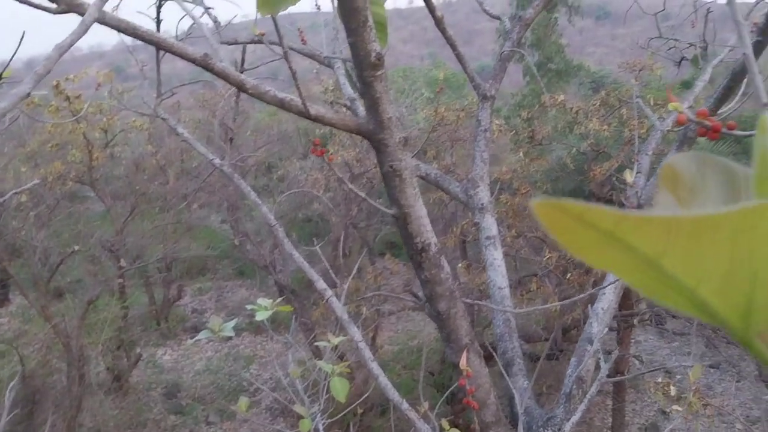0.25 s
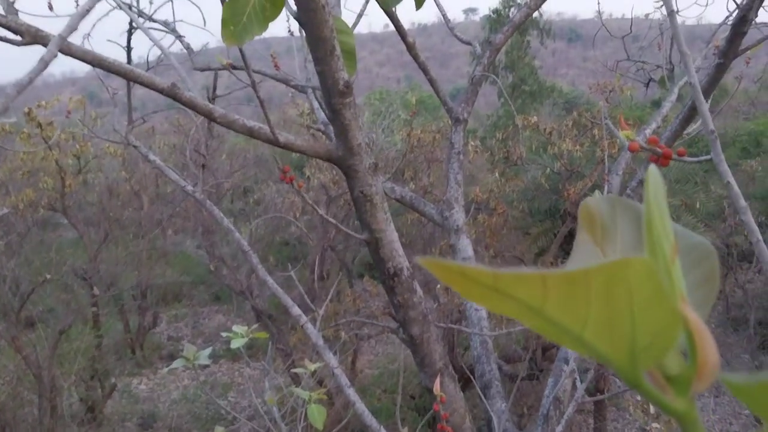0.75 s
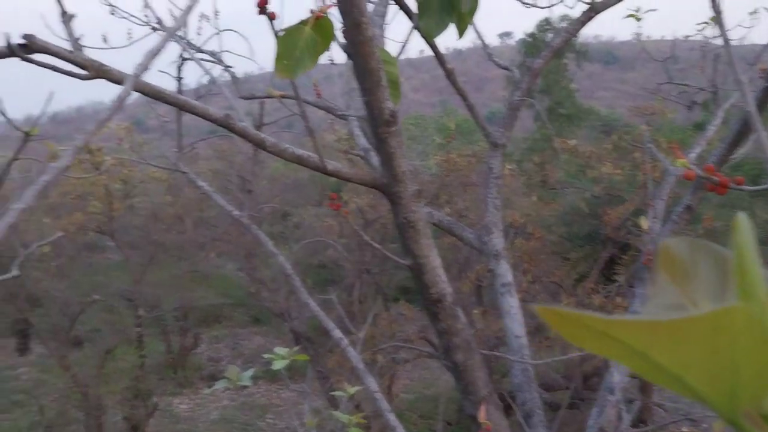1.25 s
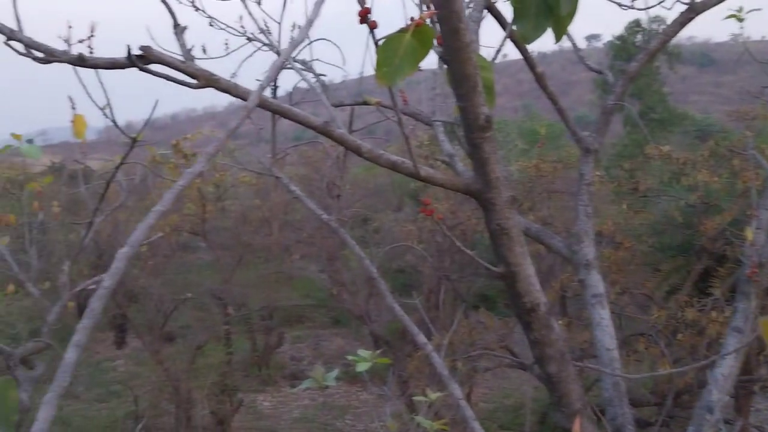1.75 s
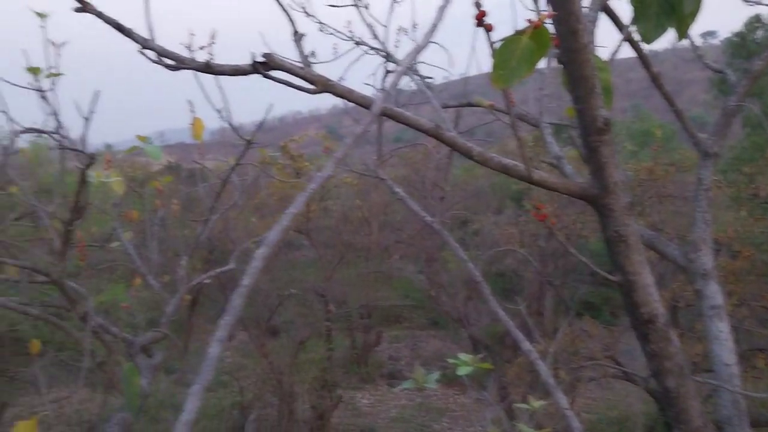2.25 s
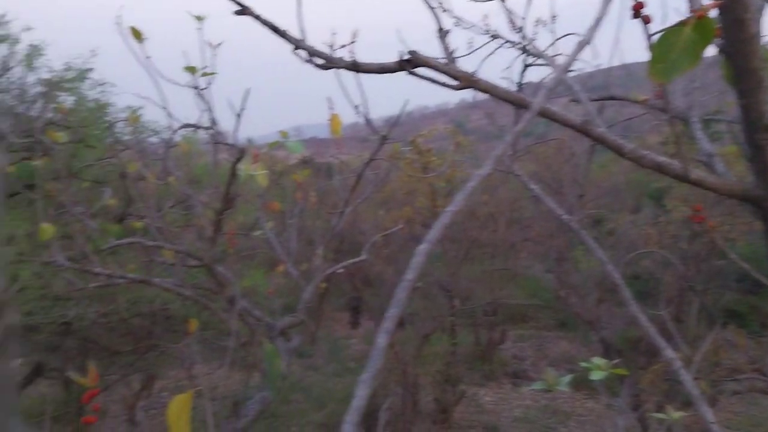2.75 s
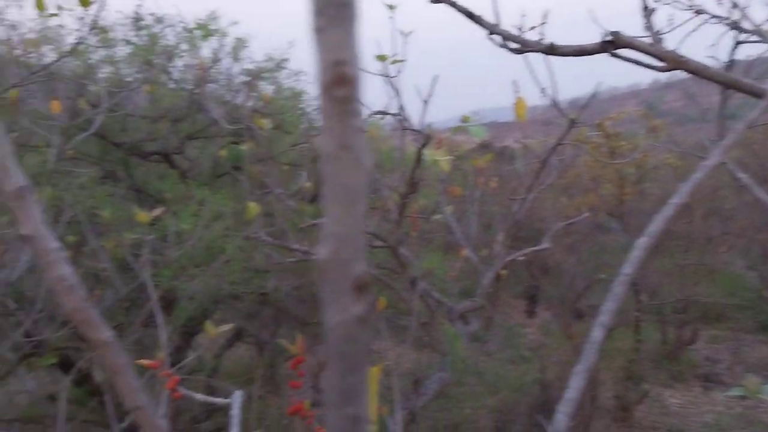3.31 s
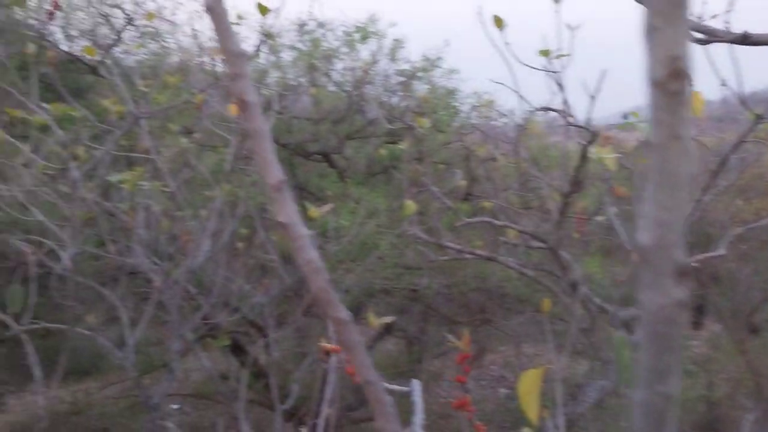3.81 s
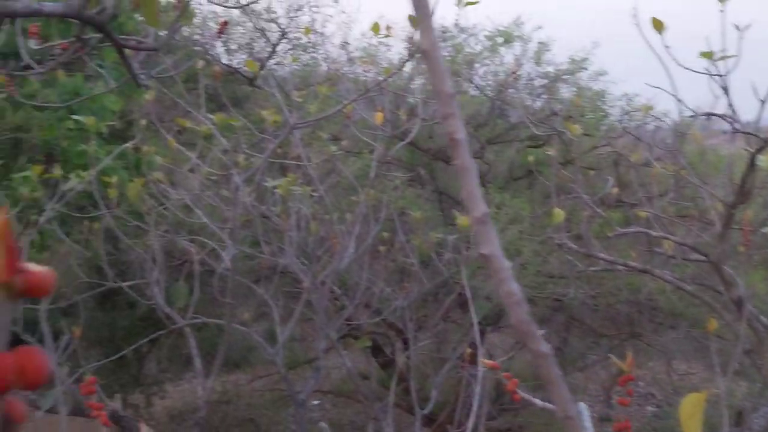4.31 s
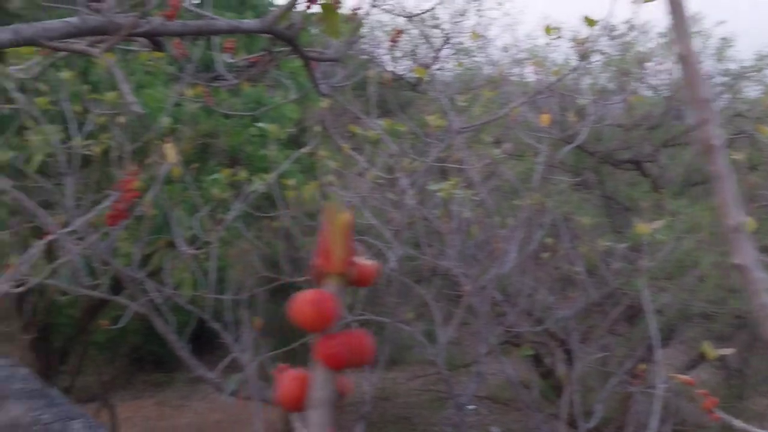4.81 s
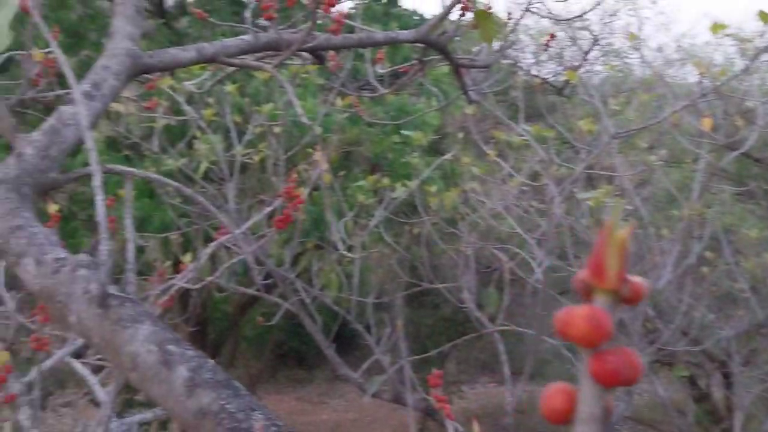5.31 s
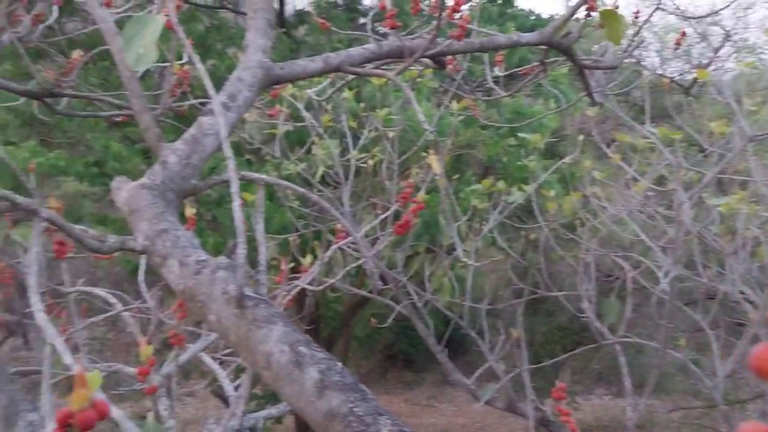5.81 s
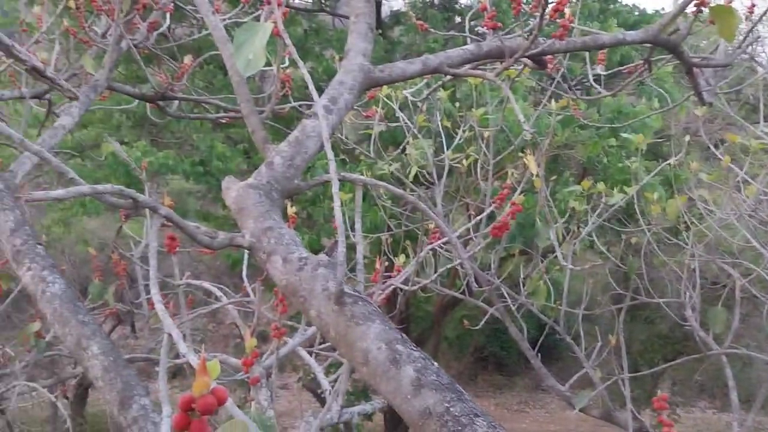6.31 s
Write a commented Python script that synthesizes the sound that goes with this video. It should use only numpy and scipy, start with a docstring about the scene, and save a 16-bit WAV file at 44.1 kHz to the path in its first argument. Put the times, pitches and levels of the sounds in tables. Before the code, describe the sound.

Dry scrub woodland, heard through a hand-held stereo microphone. A faint breeze and a blur of distant, lightly echoing chirps run throughout, with low puffs of wind bumping the microphone, strongest in the first second and around 5 s. From the start to about 1.4 s, a bird slightly right repeats five clear whistles, each sagging and then flicking sharply upward. From about 0.9 to 3.1 s a second bird sings thin, high, fast sweeps and peaks, drifting from centre to right, while a dove coos very faintly. Hoarse babbles and short clear chirps scatter all along, becoming the main birdsong after 3 s. At 4.6 to 5.1 s a finger rubs the left microphone with a scratchy hiss. Small taps and scrapes follow on the left, with a very sharp knock at 5.6 s and a weaker one at 6.2 s. Chirps continue to the end, about 6.5 s.

```python
"""Scrub woodland heard through a hand-held stereo camera, with breeze, far birds and wind puffs throughout.
First one bird repeats a whistle with an upward flick; from about 1 s a second sings high sweeps and a dove coos.
Other birds chatter and babble hoarsely all along. Near 4.6 s a finger slides over the left microphone port,
and from 5 s it taps the case. Birds are gliding sine tones echoed by trees; air, wind and slide are shaped noise;
taps are clicks with short scrapes, ringing through the case."""
import sys
import numpy as np
from scipy import signal
from scipy.fft import rfft, irfft, next_fast_len
from scipy.io import wavfile
from scipy.ndimage import uniform_filter1d, map_coordinates

SR = 44100
rng = np.random.default_rng(int(sys.argv[2]) if len(sys.argv) > 2 else 0)


def field_ratio(decibels):
    """Amplitude ratio for a level in dB (20 dB per decade); scalars and array-likes work."""
    return 10 ** (np.asarray(decibels, dtype=float) / 20)


def log_audio(samples):
    """Write samples as a 16-bit WAV file to the path given in sys.argv[1]."""
    # one column per channel
    frames = np.atleast_2d(samples).T
    # limit to full scale, then quantise
    limited = np.clip(frames, -1, 1)
    pcm = np.round(limited * 32767).astype(np.int16)
    wavfile.write(sys.argv[1], SR, pcm)


N = 288855  # samples, about 6.55 s

# In every left-right column a positive value means louder on the left.
# breeze in the scrub, tone colour: f/Hz, relative level per Hz/dB
AIR_COLOUR = [(15, -31), (25, -3), (76, -0.5), (217, -1), (373, -8.5), (1160, -19.5), (1740, -20.5),
              (2050, -0.5), (2550, -8), (3160, -9.5), (6210, -18), (8360, -26), (11300, -22.5),
              (14800, -30), (16000, -22)]
# loudness of the breeze: t/s, level/dB
AIR_LEVEL = [(0, -60), (.7, -65.5), (1.5, -66), (2.5, -66), (3.5, -68.5), (4.5, -68), (5.3, -65),
             (5.8, -66), (6.55, -65)]
# how alike left and right are in the breeze and the far birds: f/Hz, likeness (1 same, 0 unrelated, below 0 opposed)
ALIKE = [(60, 0.51), (240, 0.57), (950, -0.023), (3770, -0.18), (15000, 0.17)]
# far birds blurred together: t/s, level/dB (before each of the two layers is turned down)
CHORUS_LEVEL = [(0, -57.5), (.16, -48), (.38, -65.5), (.47, -50.5), (.66, -67.5), (.78, -51), (.91, -64.5),
                (1.07, -55.5), (1.33, -52.5), (1.9, -53.5), (2.21, -52), (2.88, -54.5), (3.3, -60),
                (3.6, -63), (4.03, -64), (4.2, -56), (4.75, -55.5), (4.84, -47.5), (5.07, -56.5),
                (5.44, -57.5), (5.95, -62), (6.55, -55.5)]
# tone colour of their blur: f/Hz, relative level per Hz/dB
CHORUS_COLOUR = [(760, -87), (1300, -36.5), (1660, -10.5), (3340, -14.5), (3710, -1.5), (5680, -15),
                 (6470, -18.5), (8000, -28.5), (10400, -83.5), (17600, -120)]
# echo among the trees: f/Hz, time to fade by 60 dB/s
TREE_FADE = [(1500, 0.35), (3000, 0.5), (6000, 0.37), (9000, 0.5)]
# dove coos: start t/s, length/s, from f/Hz, to f/Hz, level/dB
DOVE_COOS = [(.98, .04, 620, 607, -84), (1.098, .38, 680, 698, -90), (1.502, 0.29, 601, 590, -88),
             (2.139, .11, 555, 567, -81.5), (2.367, .05, 610, 614, -77.5), (2.449, 0.037, 596, 655, -80),
             (2.53, 0.082, 636, 602, -76.5), (2.646, 0.069, 623, 630, -80), (2.809, 0.056, 628, 612, -76.5),
             (2.931, .06, 625, 570, -78)]
# hoarse, burry glides: start t/s, length/s, from f/Hz, to f/Hz, level/dB, left-right/dB
BABBLE = [(.14, 0.022, 2990, 3600, -62, -6.5), (.16, 0.028, 3720, 2845, -53.5, -5),
          (.26, 0.016, 6200, 4330, -58, -5.5), (.27, 0.022, 4370, 3990, -63, -3),
          (.8, 0.045, 5500, 5167, -60, -4), (.81, 0.028, 4400, 4290, -65.5, -4),
          (.95, 0.027, 4160, 3910, -61.5, -3), (1.465, 0.047, 1680, 1940, -57, -1.5),
          (1.5, 0.052, 1980, 1830, -51, -3.5), (1.52, 0.084, 2317, 2437, -65, -24.5),
          (1.555, 0.048, 2106, 2030, -51.5, -5), (1.6, 0.11, 1496, 1514, -70.5, -4),
          (1.67, 0.084, 1700, 2170, -59, -6.5), (2.1, 0.043, 2170, 2244, -59, -9.5),
          (2.205, 0.013, 2220, 2070, -59, -17), (2.425, 0.06, 2300, 2333, -69.5, -18),
          (2.72, 0.1, 2230, 2290, -63, -9.5), (3.97, 0.055, 2306, 2415, -78.5, -33),
          (3.965, 0.0084, 4600, 5870, -59, 1), (3.973, 0.017, 5900, 4270, -57, -3),
          (4.05, 0.042, 4540, 4470, -70, -8), (4.23, 0.12, 1810, 1803, -74.5, -16),
          (4.25, 0.071, 4660, 4560, -71, -7), (4.43, 0.035, 2294, 1815, -71.5, -18),
          (4.62, 0.088, 4040, 3950, -62, 2), (4.7, 0.074, 3000, 3140, -51.5, 10),
          (4.78, 0.028, 2750, 2680, -58, -10), (4.88, 0.088, 1900, 1910, -70.5, -22),
          (5.082, .018, 4170, 4000, -53, -7), (5.15, 0.037, 6110, 6150, -66.5, -1),
          (5.205, 0.2, 2048, 2243, -70.5, -14.5), (5.625, 0.022, 5520, 5240, -59, -3),
          (5.655, 0.043, 4080, 3860, -59, -3), (5.665, 0.063, 2887, 2670, -63.5, -9),
          (5.68, 0.04, 3440, 3200, -65, -5), (5.97, .06, 2220, 4960, -69.5, -14),
          (6.14, 0.068, 2230, 1900, -69.5, -11), (6.0, 0.034, 3320, 3780, -70, 1),
          (6.02, 0.074, 4840, 5000, -67.5, -2), (6.04, 0.033, 4200, 3900, -65, 0),
          (6.045, 0.027, 4970, 2417, -54.5, -5), (6.08, 0.041, 2164, 2490, -63, -16),
          (6.125, 0.016, 2460, 2140, -57, -14), (6.09, 0.077, 2560, 3000, -61.5, -3),
          (6.32, 0.048, 1656, 2117, -64.5, -16), (6.36, 0.028, 2150, 1945, -60.5, -15.5),
          (6.4, 0.033, 1960, 1803, -64, -22), (6.435, .05, 1850, 1810, -62, -12),
          (6.38, .03, 4630, 4870, -60, -1), (6.408, 0.0118, 4870, 6300, -58.5, -5),
          (6.42, 0.051, 2530, 2710, -63, -8), (6.44, 0.036, 5070, 4920, -67, -8),
          (6.44, 0.048, 4470, 4330, -64.5, -1.5), (6.49, 0.05, 1530, 1386, -74.5, -8)]
# clear glides further off: start t/s, length/s, from f/Hz, to f/Hz, level/dB, left-right/dB
CHATTER = [(.11, .035, 5300, 4650, -65.5, -4), (.425, 0.028, 3560, 4530, -71, -18),
           (.45, .04, 4410, 3760, -63.5, -13), (.15, .04, 3820, 3690, -62, -14),
           (.015, 0.023, 5570, 4480, -73, -14.5), (.53, 0.094, 3953, 4094, -62, -7.5),
           (.65, 0.025, 4120, 3210, -64, -9), (.76, 0.1, 3720, 3690, -68, -9.5),
           (.79, 0.014, 7800, 3600, -62.5, -7), (.82, .018, 3800, 3840, -53, -13),
           (.795, .015, 4920, 3870, -67, -8), (.98, .022, 3670, 2795, -55.5, -1.5),
           (1.43, .04, 3400, 4460, -73, -3), (1.575, 0.048, 3670, 2780, -65.5, -14.5),
           (1.81, 0.038, 2190, 3000, -66, -12), (1.845, .015, 2950, 4370, -58.5, -15),
           (1.85, 0.0295, 2303, 2920, -56.5, -8.5), (1.88, 0.027, 2920, 2880, -58, -9),
           (1.995, 0.011, 4310, 2900, -60.5, -9), (2.025, 0.052, 2866, 2830, -63, -14.5),
           (2.033, 0.01, 2340, 2080, -64, -7), (2.075, 0.037, 3350, 2020, -60, -9),
           (2.141, 0.011, 2330, 2010, -44, -9.5), (2.17, 0.026, 2466, 2544, -50, -4),
           (2.2, 0.023, 3387, 3940, -71, -17), (2.25, 0.018, 2320, 4050, -65, -15),
           (2.32, 0.0078, 7800, 6030, -68, -9), (2.41, 0.043, 4830, 2810, -55.5, -7),
           (2.46, .015, 6900, 7500, -61, -6), (2.84, 0.028, 3900, 2640, -59, -14),
           (2.869, 0.01, 8480, 5260, -53.5, -7), (2.885, .03, 2880, 2900, -69.5, -14),
           (2.982, 0.0058, 8700, 6470, -58, -9), (3.04, .01, 7520, 5400, -73, 2),
           (3.135, 0.042, 2520, 4080, -68.5, -16), (3.18, 0.018, 4160, 4000, -55, -4),
           (3.2, 0.026, 4000, 2420, -63.5, -11), (3.3, .022, 3910, 3130, -63, -15),
           (3.322, 0.061, 3180, 2880, -65, -14), (3.54, 0.052, 4400, 3980, -73.5, -9),
           (3.79, 0.038, 4550, 4620, -79, -14), (3.585, 0.039, 4160, 2900, -64, -12),
           (3.55, 0.064, 2264, 4330, -77.5, -24), (3.72, 0.022, 4900, 3140, -66, -11.5),
           (3.755, 0.06, 3040, 2725, -73, -12), (3.825, 0.032, 4590, 4040, -78, -13),
           (3.85, 0.2, 3990, 3660, -79, -14), (3.85, 0.18, 3140, 2940, -74, -16),
           (4.0, 0.024, 3590, 3200, -54, -10), (4.025, 0.014, 3300, 2420, -59, -13.5),
           (4.05, 0.15, 3100, 3250, -83, -4), (4.15, 0.13, 5640, 5710, -73.5, 5.5),
           (4.35, 0.08, 5530, 5440, -68, -6), (4.38, 0.024, 2730, 2820, -72.5, -22),
           (4.41, .055, 4380, 2365, -67.5, -30), (4.585, 0.03, 4260, 4180, -58, 4.5),
           (4.95, .025, 3190, 3680, -50, 1), (5.02, 0.037, 3410, 2280, -68, -23),
           (5.066, .003, 7400, 4560, -63, 4), (5.075, 0.0077, 7760, 4700, -52.5, -3),
           (5.12, .06, 3240, 2680, -74.5, -18), (5.14, 0.056, 4070, 3120, -72, 5),
           (5.26, .07, 4900, 4730, -73, 3), (5.29, 0.087, 4250, 3650, -71, -12),
           (5.33, .04, 3735, 2450, -61.5, -12), (5.52, 0.11, 4700, 4500, -73, 0),
           (5.6, 0.086, 4460, 3600, -68, -7), (5.75, 0.084, 3920, 4050, -77, -9),
           (5.86, .1, 3830, 4040, -77, -9), (5.78, 0.0032, 5670, 4600, -71.5, 2),
           (5.87, 0.017, 1960, 2010, -65, -12), (6.135, 0.04, 6100, 6100, -73, 8)]
# puffs of wind: fully up at t/s, hold/s, level/dB, twice the left-right difference/dB
PUFFS = [(0, 0.062, -51.5, 22.5), (0.151, .02, -48, 21), (0.276, 0.016, -67, 15), (0.471, .02, -68, 5),
         (0.832, 0.035, -57, 3), (0.986, 0.13, -58, -22), (1.945, 0.23, -73.5, 0), (2.81, .06, -68, -13),
         (4.07, 0.054, -74, -13), (4.911, 0.047, -55.5, 26), (5.013, 0.038, -55, -17),
         (5.098, 0.014, -45, 12), (5.25, 0.023, -53.5, 12), (5.603, .04, -63.5, 13),
         (6.204, 0.022, -62.5, -6), (6.306, 0.22, -83, -11)]
# tone colour of the wind thumps: f/Hz, relative level per Hz/dB
THUMP_COLOUR = [(12, -49), (20, -17.5), (43, -1), (97, -2.5), (269, -27.5), (334, -26.5), (500, -48.5),
                (650, -51.5), (1100, -120)]
# loudness of the sliding finger: t/s, hiss level/dB, rasp level/dB, drag level/dB (all before a 6 dB gain)
SLIDE_LEVELS = [(4.591, -71.5, -88, -105), (4.601, -51.5, -79, -103), (4.638, -49, -64, -93),
                (4.696, -37, -45, -49), (4.775, -36.5, -38, -51.5), (4.84, -46, -42.5, -63.5),
                (4.964, -46.5, -45, -68.5), (4.994, -91, -62.5, -73), (5.035, -51.5, -48, -67),
                (5.043, -69.5, -52.5, -63), (5.14, -83, -72.5, -87)]
# tone colour of the rubbed port: f/Hz, relative level per Hz/dB
PORT_COLOUR = [(88, -35), (150, -13), (398, -18.5), (439, -14), (524, -24), (578, -17.5), (1310, -11.5),
               (2100, -2), (2360, -4), (5460, 3), (8400, -12.5), (12400, -9.5), (16000, -9)]
# taps on the case: t/s, strength/dB (before a 22.5 dB gain and the case), scrape re click/dB, scrape length/s
TAPS = [(5.032, -52.5, -17, .003), (5.085, -48, -38, 0.0045), (5.2131, -66, -14, .004),
        (5.334, -67, -8.5, 0.039), (5.466, -73.5, -11.5, 0.074), (5.608, -22, -46, 0.0086),
        (6.2055, -33, -24.5, 0.01), (6.41, -70, -8, .03)]
# ringing tones of the plastic case: f/Hz, width/Hz, level/dB
CASE_TONES = [(1900, 380, 4), (3600, 950, 2.5), (5300, 1470, 0.5), (12300, 6400, -16.5)]
# singer's overtones: multiple of the pitch, level re note at its loudest/dB
SONG_OVERTONES = [(2, -41.5)]
# singer's peaked notes: top t/s, rise/s, fall/s, from f/Hz, top f/Hz, level/dB,
# pointedness (over 1 a spike, under 1 a dome)
POINTS = [(1.219, .052, .042, 5120, 7510, -44.5, 2), (1.378, .052, 0.033, 5200, 7390, -41, 1.54),
          (1.53, 0.051, .038, 5010, 7040, -44, 1.37), (1.731, 0.01, 0.022, 5130, 6700, -41, 0.7),
          (1.937, .016, 0.018, 5220, 6480, -40, 0.68), (2.138, 0.0095, 0.0098, 5670, 6310, -40.5, 0.41),
          (2.338, 0.017, 0.014, 6540, 6340, -44.5, 0.49), (2.929, .018, 0.018, 3285, 6510, -46.5, 1.5),
          (3.04, .018, 0.011, 3250, 6140, -50.5, 1.6)]
# singer's rises that level off: start t/s, length/s, from f/Hz, plateau f/Hz, level/dB
HOOKS = [(1.641, 0.073, 3630, 5050, -39), (1.842, 0.073, 3780, 5180, -40.5),
         (2.034, .09, 3570, 4990, -42.5), (2.241, .085, 3840, 4870, -45.5),
         (2.465, 0.051, 5450, 6780, -50.5), (2.674, .045, 5000, 6770, -51.5)]
# singer's nearly straight glides: start t/s, length/s, from f/Hz, to f/Hz, level/dB
SWEEPS = [(0.942, .022, 5190, 5510, -49.5), (1.086, .022, 5390, 5590, -43),
          (2.522, 0.074, 3480, 6300, -49.5), (2.701, .028, 2730, 4600, -55.5),
          (2.741, .06, 3740, 5720, -42), (2.797, .015, 5840, 5290, -51), (2.881, 0.011, 4830, 5300, -46.5),
          (2.999, 0.0055, 4610, 4140, -43.5), (3.005, 0.028, 4500, 5830, -53.5),
          (3.041, 0.021, 5490, 5030, -45.5)]
# where the singer is heard, as the camera turns away: t/s, left-right/dB
SINGER_PAN = [(1.2, 1), (1.7, -3.5), (2.3, -6), (3.05, -5.5)]
# whistler's overtones: multiple of the pitch, level re note at its loudest/dB
WHISTLE_OVERTONES = [(2, -53), (3, -34.5), (5, -38), (6, -40.5)]
# whistles: start t/s, length up to the flick/s, level/dB, sag starts this long after the start/s,
# pitch it sags to f/Hz, top of the flick f/Hz
WHISTLES = [(.01, .181, -41, .073, 2368, 3540), (.348, 0.17, -38, 0.072, 2373, 3610),
            (0.669, 0.17, -38.5, 0.086, 2407, 3690), (0.974, .149, -39, .097, 2432, 3730),
            (1.238, 0.14, -41.5, 0.066, 2437, 3350)]
# how each whistle begins: t after its start/s, f/Hz, level re whistle/dB
WHISTLE_RISE = [(0, 2140, -15), (0.014, 2450, -2.5), (.027, 2578, -2), (.04, 2583, -1)]
# microphone response: f/Hz, level/dB
MIC = [(30, -1.5), (7200, 0.5), (8600, -9), (10500, -3), (16000, 2)]

T = np.arange(N) / SR  # time of each sample, s


def unit(x):
    """Scales to an rms (average strength) of 1."""
    return x / np.sqrt(np.mean(x ** 2) + 1e-20)


def along(points, hz):
    """Reads a value off (f/Hz, value) points, with frequency on a log axis."""
    f, v = np.transpose(points)
    return np.interp(np.log(hz + 1), np.log(f + 1), v)


def curves(rows):
    """Turns each column after the time into one value per sample."""
    s, *columns = np.transpose(rows)
    return [np.interp(T, s, column) for column in columns]


def wobble(rate, size=N):
    """Draws a smooth random curve through rate random points a second."""
    points = rng.standard_normal(int(size * rate / SR) + 4)
    return map_coordinates(points, [np.arange(size) * rate / SR])


def filtered(x, response):
    """Reshapes the spectrum of x by a response that depends on frequency."""
    m = next_fast_len(N + SR // 2)
    hz = np.fft.rfftfreq(m, 1 / SR)
    return irfft(rfft(x, m) * response(hz), m)[..., :N]


def sides(pan_db):
    """Gives the left and right gains for a left-right difference in dB."""
    return field_ratio(np.array([pan_db / 2, -pan_db / 2]))


def rush(colour, alike, patchy_db):
    """Makes stereo noise of rms 1, whose loudness varies in random patches of time and pitch."""
    z = signal.stft(rng.standard_normal((2, N)), nperseg=512)[2]
    patches = uniform_filter1d(rng.standard_normal(z.shape[1:]), size=5, axis=0)
    patches = uniform_filter1d(patches, size=8, axis=1)
    pair = signal.istft(z * field_ratio(patchy_db * unit(patches)), nperseg=512)[1][:, :N]

    def response(hz):
        # more shared (mid) noise makes the sides alike, more opposed (side) noise sets them apart
        turn = np.arccos(np.clip(along(alike, hz), -1, 1)) / 2
        return field_ratio(along(colour, hz)) * [np.cos(turn), np.sin(turn)]

    mid, side = filtered(pair, response)
    return unit(np.array([mid + side, mid - side]))


def bird(notes, overtones, flutter_db, hoarse, lag_s, breath_db=-60, flutter_rate=110):
    """Sings gliding sines with unsteady overtones and breath; hoarseness spreads each into a band of noise."""
    out, edge_s = np.zeros((2, N + SR)), .003
    for pan_db, rows in notes:
        s, hz, db = np.transpose(rows)
        t = np.arange(s[0] - edge_s, s[-1] + edge_s, 1 / SR)
        size = len(t)
        glide = uniform_filter1d(np.interp(t, s, hz), size=110, mode="nearest")
        # the left port hears it later
        phase = 2 * np.pi * (np.cumsum(glide) / SR - glide * np.array([[lag_s], [0]]))
        spread = .15 * hz.mean()
        burr = wobble(spread, size) * np.sin(phase) + wobble(spread, size) * np.cos(phase)
        effort_db = np.interp(t, s, db)
        upper = 0
        for k, overtone_db in overtones:
            unsteady = 1 + .5 * wobble(60, size)
            upper = upper + field_ratio(overtone_db) * unsteady * np.sin(k * phase) * (k * glide < SR / 2)
        upper = upper * field_ratio(effort_db - db.max())  # overtones grow faster than the note
        tone = np.sqrt(1 - hoarse) * np.sin(phase) + np.sqrt(hoarse) * burr + upper
        tone = tone + field_ratio(breath_db) * rng.standard_normal(tone.shape)
        to_edge = np.minimum(t - t[0], t[-1] - t)
        fade = np.sin(np.pi / 2 * np.clip(to_edge / (2 * edge_s), 0, 1)) ** 2
        level = field_ratio(effort_db + flutter_db * wobble(flutter_rate, size))
        start = max(round(t[0] * SR), 0)
        out[:, start:start + size] += np.sqrt(2) * fade * level * tone * sides(pan_db)[:, None]
    return out[:, :N]


def glides(table, in_db=0.5):
    """Slides each note between two pitches, lingering at the lower one; in_db is its start re level."""
    notes = []
    for s, length, from_hz, to_hz, db, pan_db in table:
        middle_hz = min(from_hz, to_hz) + .4 * abs(from_hz - to_hz)
        notes.append((pan_db, [(s, from_hz, db + in_db), (s + length / 2, middle_hz, db),
                               (s + length, to_hz, db + 0.5)]))
    return notes


def trees(x, wet_db, gap_s):
    """Trunks and ground scatter the song back; every 0.2 s stretch gets a new random scatter."""
    out, hop = np.zeros((2, N + 2 * SR)), SR // 5
    for start in range(0, N, hop):
        hz, t, z = signal.stft(rng.standard_normal((2, SR * 3 // 4)), SR, nperseg=256)
        fade = field_ratio(-60 * t / along(TREE_FADE, hz)[:, None])
        tail = signal.istft(z * fade, SR, nperseg=256)[1]
        tail *= np.clip(np.arange(tail.shape[1]) / SR / gap_s, 0, 1)  # builds up over gap_s
        wet = signal.fftconvolve(x[:, start:start + hop], tail / np.linalg.norm(tail[0]), axes=1)
        out[:, start:start + wet.shape[1]] += wet
    return x + field_ratio(wet_db) * out[:, :N]


def air():
    """A breeze in the scrub: soft, slightly patchy noise that slowly changes in loudness."""
    return field_ratio(curves(AIR_LEVEL)[0]) * rush(AIR_COLOUR, ALIKE, patchy_db=-0.95)


def chorus():
    """Many short falling chirps too far off to tell apart, over their own blur of noise."""
    notes = []
    for when, pitch, length, bend, size, pan in rng.random((260, 6)):
        s, hz, db = when * N / SR, 2500 * 2.4 ** pitch, -12 * size
        end_s, end_hz = s + 0.01377 + 0.062 * length, hz * (0.69 + 0.19 * bend)
        notes.append((12 * pan - 10, [(s, hz, db), (end_s, end_hz, db)]))
    chirps = bird(notes, [], flutter_db=3, hoarse=.5, lag_s=0)
    far = unit(trees(chirps, wet_db=7.5, gap_s=0.002))
    blur = rush(CHORUS_COLOUR, ALIKE, patchy_db=4)
    return field_ratio(curves(CHORUS_LEVEL)[0]) * (field_ratio(-9) * far + field_ratio(-11.5) * blur)


def dove():
    """Far-off coos: low, nearly pure gliding tones in the centre, with a strong flutter."""
    coos = glides([(*coo, 0) for coo in DOVE_COOS])
    return trees(bird(coos, [], flutter_db=5.5, hoarse=0.03, lag_s=0), wet_db=-8, gap_s=0.01)


def babbler():
    """Hoarse birds further off: each glide is more a narrow band of noise than a clean tone."""
    voice = bird(glides(BABBLE), [], flutter_db=3.5, hoarse=.55, lag_s=60e-6)
    return trees(voice, wet_db=-1.5, gap_s=0.0074)


def chatter():
    """Clear-voiced birds further off: short, almost pure glides with echoes."""
    voice = bird(glides(CHATTER), [], flutter_db=3.0, hoarse=0.08, lag_s=60e-6)
    return trees(voice, wet_db=-4.0, gap_s=0.0073)


def wind():
    """Low lumpy buffeting, almost unrelated in the two ports; each puff swells, holds and dies away."""
    calm_db, rise_s, fall_s = -73.5, 0.031, 0.024  # wind between puffs; time constants
    strength = field_ratio(calm_db)
    for s, hold, db, pan_db in PUFFS:
        shape = np.exp(np.minimum(T - s, 0) / rise_s - np.maximum(T - s - hold, 0) / fall_s)
        strength = strength + field_ratio(db) * sides(pan_db / 2)[:, None] * shape
    lumps = field_ratio(2.7 * np.array([wobble(7.3), wobble(12)]))
    return strength * unit(lumps * rush(THUMP_COLOUR, [(30, 0.051)], patchy_db=-1.0))


def slide():
    """Skin sticks and slips over the port: dense uneven grains in three bands, each with its own loudness."""
    grain_db = 3.3 * rng.standard_normal((2, N)) + 0.31 * wobble(120)
    grains = rng.standard_normal((2, N)) * field_ratio(grain_db)
    on = (T > SLIDE_LEVELS[0][0]) & (T < SLIDE_LEVELS[-1][0])
    bands_hz = [(6700, 15700), (1080, 4580), (157, 1420)]  # hiss, rasp, drag
    leaks_db = [-36, -46, -48]  # how much fainter each band is on the right
    out = np.zeros((2, N))
    for db, (low, high), leak_db in zip(curves(SLIDE_LEVELS), bands_hz, leaks_db):
        def response(hz):
            return field_ratio(along(PORT_COLOUR, hz)) / (1 + (low / (hz + 1)) ** 6) / (1 + (hz / high) ** 6)

        out += field_ratio(db + 6.0) * unit(filtered(grains, response)) * field_ratio([[0], [leak_db]])
    return on * out


def taps():
    """A fingertip clicks on the plastic case and scrapes briefly; the case rings at a few broad tones."""
    blows = np.zeros(N + SR)
    t = np.arange(SR // 10) / SR
    for s, db, scrape_db, scrape_s in TAPS:
        scrape = field_ratio(scrape_db) * rng.standard_normal(len(t)) / (1 + (t / scrape_s) ** 4)
        click = t == 0
        blows[round(s * SR):][:len(t)] += field_ratio(db + 22.5) * (click + scrape)

    def case(f):
        total = 0
        for k, (centre, width, db) in enumerate(CASE_TONES):
            ring = 1j * f * width / (centre * centre - f * f + 1j * f * width)
            total = total + (-1) ** k * field_ratio(db) * ring  # neighbours have opposite signs
        return total

    return filtered(blows[:N], case) * field_ratio([[0], [-34]])  # the right port hears far less


def song():
    """Shapes the singer's notes: peaks are spikes or domes, hooks level off, sweeps run nearly straight."""
    def pan(s):
        return np.interp(s, *np.transpose(SINGER_PAN))

    u = np.linspace(0, 1, num=7)  # share of the way through a hook or up a flank
    notes = glides([(*row, pan(row[0])) for row in SWEEPS], in_db=-10)
    falls_to, in_db, top_db, out_db = .75, -12.5, -3, -8.5  # peaks: end pitch over top; dB re level
    for s, rise, fall, from_hz, top_hz, db, pointed in POINTS:
        def flank(foot_hz, foot_db):
            hz = foot_hz + (top_hz - foot_hz) * u ** pointed
            return [hz, db + foot_db * (1 - u) ** 4 + top_db * u ** 4]

        up = np.transpose([s - rise * (1 - u), *flank(from_hz, in_db)])
        down = np.transpose([s + fall * (1 - u), *flank(falls_to * top_hz, out_db)])
        notes.append((pan(s), np.vstack([up, down[-2::-1]])))
    bend, swell = 0.23, 0.37  # hooks: shares of the length
    for s, length, from_hz, top_hz, db in HOOKS:
        hz = top_hz - (top_hz - from_hz) * np.exp(-u / bend)
        swell_db = np.interp(u, [0, swell, .83, 1], [-15.5, 0, 0, -9])
        notes.append((pan(s), np.transpose([s + length * u, hz, db + swell_db])))
    return notes


def singer():
    """The second bird: high, slightly hoarse gliding tones with one weak overtone and some breath."""
    voice = bird(song(), SONG_OVERTONES, flutter_db=1.5, hoarse=0.056, lag_s=40e-6, breath_db=-44.0)
    return trees(voice, wet_db=-3.0, gap_s=0.0038)


def whistles():
    """Shapes each whistle: a quick rise, a catch in the voice, a slow sag, then a flick up and back."""
    pan_db, catch_s, catch_db = -8.5, .009, -4  # catch: half width, level re whistle
    sag_to, sag_db = .85, 1  # share of the length at which the sag ends; dB re level there
    up_s, down_s, end_hz, top_db, end_db = 0.007, .009, 3000, -6.5, -2  # the flick; dB re level
    held_hz = WHISTLE_RISE[-1][1]
    notes = []
    for s, length, db, sag_s, low_hz, flick_hz in WHISTLES:
        rise = [(s + after, hz, db + rel_db) for after, hz, rel_db in WHISTLE_RISE]
        catch = [(s + sag_s - 2 * catch_s, held_hz, db - 1.5), (s + sag_s - catch_s, held_hz, db + catch_db)]
        sag = [(s + sag_s, held_hz, db + 0.5), (s + sag_to * length, low_hz, db + sag_db),
               (s + length, low_hz, db)]
        flick = [(s + length + up_s, flick_hz, db + top_db),
                 (s + length + up_s + down_s, end_hz, db + end_db)]
        notes.append((pan_db, rise + catch + sag + flick))
    return notes


def whistler():
    """The main bird: a nearly pure whistle with faint overtones, fast flutter, breath and few echoes."""
    voice = bird(whistles(), WHISTLE_OVERTONES, flutter_rate=190, flutter_db=2.5, hoarse=.012,
                 lag_s=60e-6, breath_db=-44.0)
    return trees(voice, wet_db=-9, gap_s=0.0057)


def scene():
    """Adds up all sources, from the background to the main bird."""
    background = air() + chorus() + dove() + babbler() + chatter()
    handling = wind() + slide() + taps()
    return background + handling + singer() + whistler()


def roll_off(x):
    """The treble ends steeply here."""
    return signal.sosfilt(signal.butter(12, 16530, fs=SR, output="sos"), x)


def record(dry):
    """The microphones dip near 8.6 kHz and fade out below 35 Hz; the finished mix is cut off at 15850 Hz."""
    def response(hz):
        return field_ratio(along(MIC, hz)) * (hz < 15850) / (1 + (35 / (hz + 1)) ** 4)

    mix = filtered(dry, response)
    return roll_off(mix)


dry = scene()
out = record(dry)
log_audio(out)
```